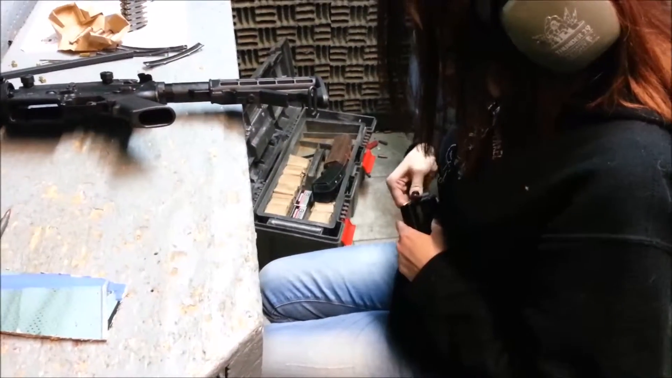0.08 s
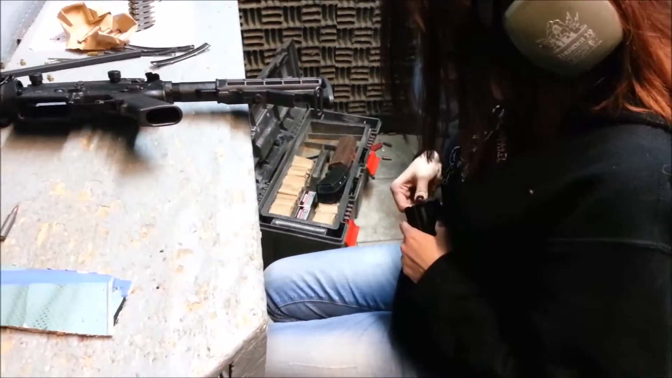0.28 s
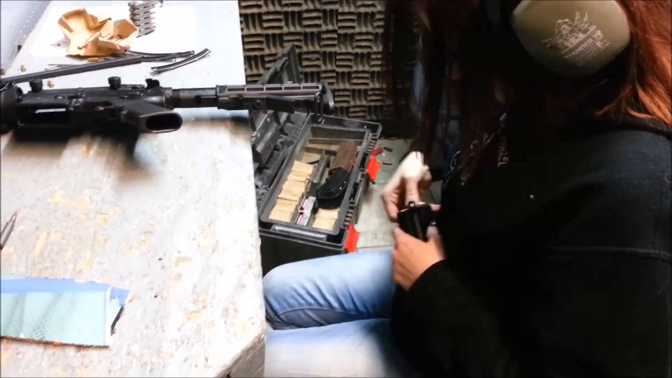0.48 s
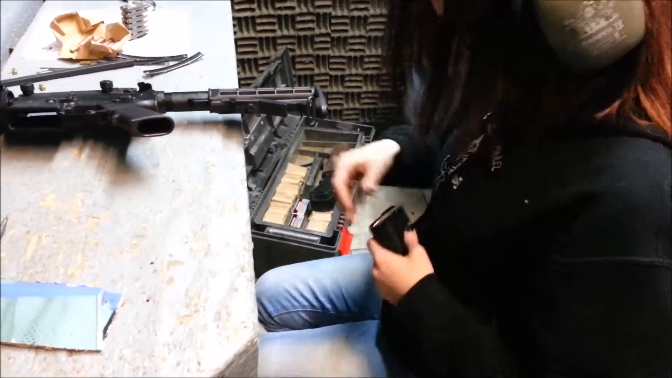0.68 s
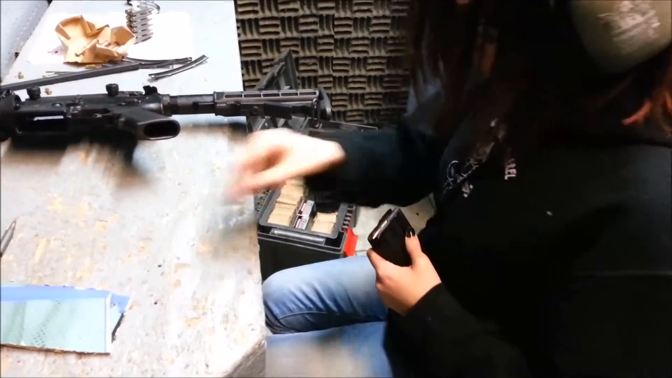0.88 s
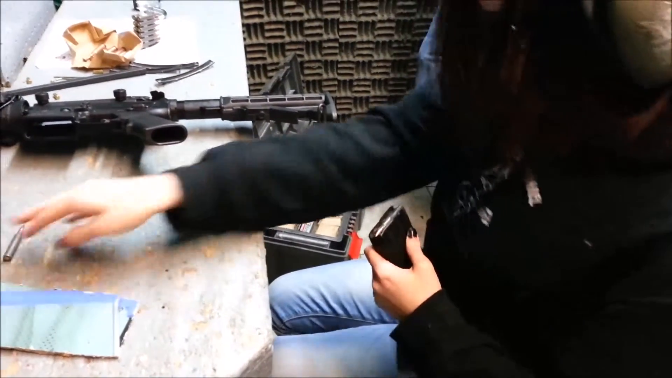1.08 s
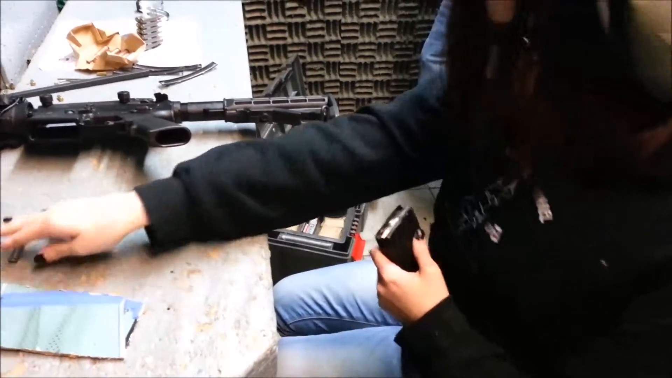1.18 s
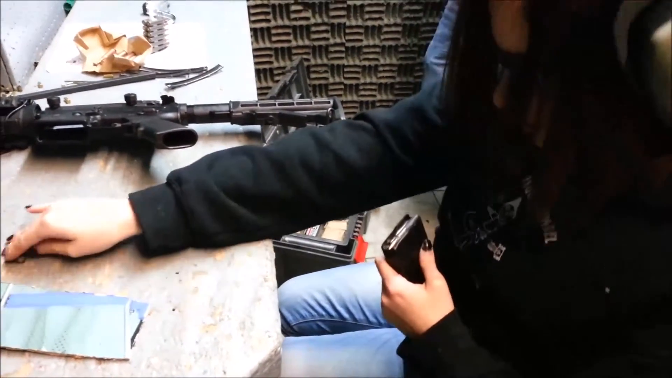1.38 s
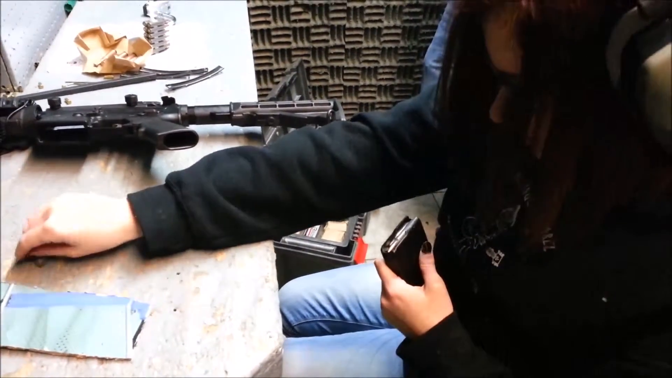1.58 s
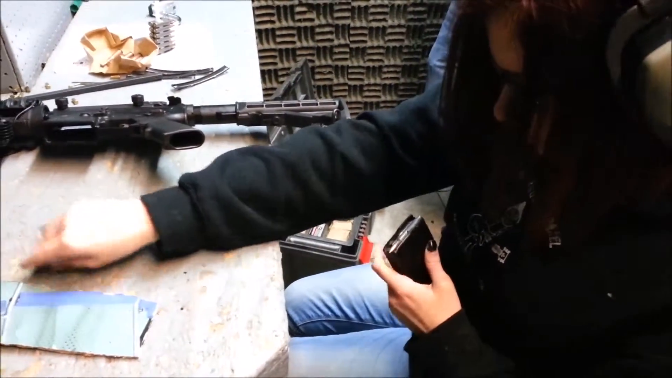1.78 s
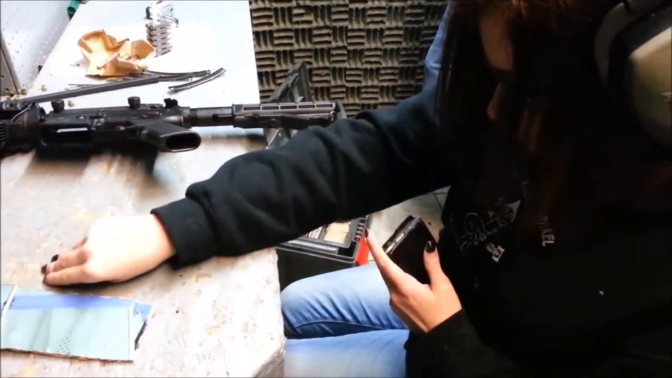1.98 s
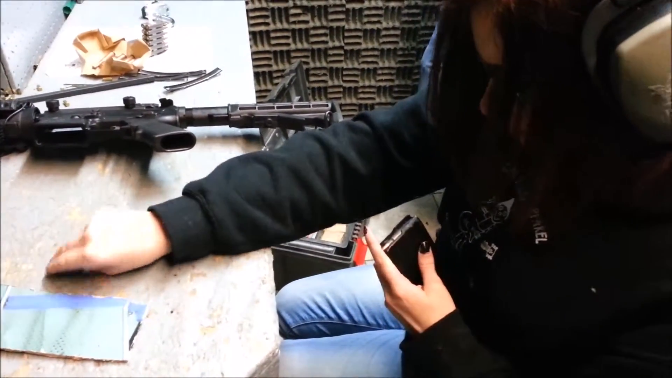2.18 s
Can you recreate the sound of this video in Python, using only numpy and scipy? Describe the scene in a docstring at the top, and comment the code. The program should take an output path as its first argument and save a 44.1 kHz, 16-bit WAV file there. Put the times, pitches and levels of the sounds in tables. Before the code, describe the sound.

One loud, hard click as a cartridge is pushed into a hand-held magazine, a faint sleeve swish, then fingers drag and knock cartridges on a bench; close stereo microphone in a small padded booth.

```python
"""Loading a magazine in a padded booth

A cartridge is worked into a hand-held magazine and snaps under the feed lips, loud enough to overload the microphone.
A sleeve swishes as the arm reaches out; fingers drag the next cartridges over a bench and knock them about.
Blows are short bursts plus fading rings and echoes; cloth, skin and the quiet ventilation are filtered noise."""
import sys
import numpy as np
from scipy import signal
from scipy.fft import rfft, irfft, next_fast_len
from scipy.io import wavfile
from scipy.ndimage import uniform_filter1d, map_coordinates

SR = 44100
rng = np.random.default_rng(int(sys.argv[2]) if len(sys.argv) > 2 else 0)


def to_wav(s):
    """Save 16-bit WAV."""
    ch = np.atleast_2d(s).T  # columns
    pcm = np.round(np.clip(ch, -1, 1) * 32767)  # PCM
    wavfile.write(sys.argv[1], SR, pcm.astype(np.int16))


N = 97020  # samples, 2.2 seconds

# Levels of single sounds are those before any high-pass or balance filter.
# The cartridge is forced past the feed lips and seated. Each row: start in seconds, level in dB,
# treble limit of the contact in Hz, chatter decay in seconds, shell clack against the ring in dB.
SNAPS = [(.2427, -14, 7070, 0.0029, -14.5), (0.2569, -4.5, 13300, 0.005, -9.5),
         (0.2592, -8.5, 12000, 0.0021, 4.5)]
# Small sounds at the magazine: a faint short noise just before the snap (the two rows from 0.235 to 0.24 s);
# in the other rows cartridge and thumb shift. Each row: start in seconds, level in dB, treble limit in Hz.
SMALL_SOUNDS = [(.0115, -34.5, 2690), (.0385, -38, 850), (.192, -45, 825), (.2355, -34.5, 1510),
                (.2395, -38, 2030), (.331, -43, 1010), (.441, -46.5, 875), (0.484, -49, 2410),
                (.493, -51, 2240), (.5505, -42, 1730)]
# Ring of the loaded magazine. Each row: pitch in Hz, relative level in dB, time to fade by 60 dB in seconds.
MAGAZINE_MODES = [(762, 0.5, 0.053), (1085.5, -2, 0.092), (1181, -3.5, .07), (1255, 0, 0.063),
                  (1291, -0.5, .085), (1466, 0, 0.057), (1663, -3.5, 0.043), (1979, -3.5, 0.045),
                  (2293, 0, 0.045), (2380, -4.5, 0.11), (2790, -6, 0.098), (3217, -6.5, 0.14),
                  (3330, -2.5, .11), (3760, -7, 0.068), (3872, -8, .11), (4295, -1.5, .06),
                  (4655, -1.5, 0.067)]
# Crack of metal on the magazine. Each row: frequency in Hz, relative level in dB.
MAGAZINE_CRACK = [(60, -19), (330, -32), (490, -22), (690, 0), (980, -2.5), (1300, -0.5), (2000, -4),
                  (3500, -4.5), (5200, -9), (7500, -13.5), (13800, -11.5)]
# The magazine as the two microphones hear it. Each row: frequency in Hz, left minus right in dB.
MAGAZINE_BALANCE = [(700, -1), (1300, 1.5), (2300, 10.5), (4400, 1.5), (6500, -6.5), (13000, 0)]
# Fingers rustle on the magazine. Each row: time in seconds, level in dB.
GRIP_LEVEL = [(0, -45.5), (.06, -62.5), (.12, -57.5), (.22, -60), (.37, -56.5), (.43, -60), (.53, -60.5),
              (.56, -52.5), (.6, -52), (.64, -72)]
# Cartridges knock on the bench. Each row: start in seconds, level in dB, treble limit in Hz,
# bass boost in dB, pitch favoured by the struck spot in Hz.
KNOCKS = [(1.4256, -48, 7100, -13, 3000), (1.545, -37, 1570, -14, 1100), (1.6084, -29, 2550, 9.5, 785),
          (1.6113, -29, 1640, 4.5, 1120), (1.6183, -25.5, 1330, 1.5, 1260), (1.6225, -30, 3630, 10.5, 1230),
          (1.669, -33.5, 1000, 15, 805), (1.677, -40, 1290, 8, 1200), (1.7458, -31.5, 10000, 19, 3000),
          (1.7683, -29.5, 1270, 3, 705), (1.7755, -37, 1290, 1, 1510), (1.821, -52, 1210, 3, 780),
          (1.828, -42, 1420, -27, 1550), (1.869, -29, 4300, 16, 3120), (1.9227, -33, 4480, -0.5, 2800),
          (2.0526, -35.5, 1170, -13, 760), (2.149, -44, 2010, 10.5, 1580), (2.157, -33, 7770, 3, 2970),
          (2.168, -47.5, 6040, 21, 3000)]
# The hand bumps the bench. Each row: start in seconds, level in dB.
BUMPS = [(1.537, -35.5), (1.575, -42.5), (1.643, -34), (1.6557, -33.5), (1.688, -41), (2.183, -44)]
# Ring of the bench top. Each row: pitch in Hz, relative level in dB, time to fade by 60 dB in seconds.
BENCH_MODES = [(155, 7, 0.35), (207, -6, 0.076), (288, 0, 0.06), (367, -0.5, 0.13), (472, -22, 0.14),
               (777, 1.5, 0.062), (1118, -4, 0.11), (1263, 1, 0.12), (1540, 10, 0.089), (2624, 7, 0.037),
               (3040, 8, 0.021)]
# Clack of a cartridge on the bench. Each row: frequency in Hz, relative level in dB.
BENCH_CLACK = [(60, -26), (120, -34), (200, -1.5), (450, -3), (800, -3), (1600, 1), (2100, 2), (3000, 1),
               (4000, -8), (4700, -3.5), (6000, -12), (14000, -5.5)]
# A dragged cartridge sticks and slips. Each row: start in seconds, level in dB.
SLIPS = [(1.469, -34.5), (1.481, -30), (1.493, -31.5), (1.5045, -32.5), (1.52, -34), (1.5373, -35.5),
         (1.5614, -32), (1.598, -38)]
# Colour of the drag. Each row: frequency in Hz, relative level in dB.
DRAG_COLOUR = [(200, -28), (380, -9), (600, -4.5), (900, 1.5), (1150, -11), (1700, 6), (2200, 3.5),
               (3000, -1.5), (3950, -12), (4400, -28), (6500, -42), (14000, -38)]
# Ring of the dragged cartridge. Each row: pitch in Hz, relative level in dB, time to fade by 60 dB in seconds.
CASE_MODES = [(1650, -0.5, 0.054), (3660, -10, 0.024)]
# Fingers rub along the bench. Each row: time in seconds, level in dB.
RUB_LEVEL = [(1.38, -77), (1.41, -56.5), (1.5, -54.5), (1.56, -47), (1.68, -55), (1.72, -50), (1.79, -57),
             (1.85, -55), (1.89, -55), (1.99, -54.5), (2.06, -59.5), (2.13, -68), (2.2, -48.5)]
# Colour of skin rubbing on the bench. Each row: frequency in Hz, relative level in dB.
RUB_COLOUR = [(90, -37.5), (130, -21.5), (170, -1.5), (290, -5.5), (420, -8), (600, -15.5), (1000, -21.5),
              (3000, -25.5), (7000, -31), (14000, -33)]
# A fingertip judders on the bench. Each row: peak in seconds, spread in seconds, pitch in Hz, level in dB.
JUDDERS = [(1.43, 0.019, 234.5, -57.5), (1.954, 0.055, 165.9, -52)]
# Sleeve swishes. Each row: peak in seconds, rise in seconds, fall in seconds, level in dB,
# centre in Hz, distance from the centre to half gain in octaves.
SWISHES = [(0.585, 0.014, 0.016, -47.5, 3580, 0.088), (.588, 0.02, 0.012, -51.5, 4720, 0.073),
           (.59, 0.035, .02, -59.5, 6000, 1), (.84, 0.051, 0.1, -72, 5100, 0.068),
           (.99, 0.092, 0.043, -69, 5380, 0.06), (1.109, 0.077, 0.052, -68.5, 4920, 0.084)]
# Colour of ventilation and hiss. Each row: frequency in Hz, relative level in dB per Hz.
AIR_COLOUR = [(15, -57.5), (25, -35.5), (51, -12.5), (117, -2), (290, -5.5), (520, -12), (755, -14),
              (1360, -18.5), (2310, -19), (4260, -22.5), (5270, -23), (6350, -26.5), (14500, -23)]
# Likeness of left and right in the air. Each row: frequency in Hz, correlation from 0 to 1.
AIR_LIKENESS = [(50, 0.1), (150, 0.09), (500, 0.25), (1500, .3), (6000, 0.063)]
# Likeness of left and right in the echoes, cloth and skin. Each row: frequency in Hz, correlation from 0 to 1.
ROOM_LIKENESS = [(200, 0.93), (700, 0.24), (1500, 0.48), (4000, 0.077)]
# Decay of the booth. Each row: frequency in Hz, time to fade by 60 dB in seconds.
ROOM_T60 = [(150, .19), (600, 0.24), (1500, 0.14), (3300, 0.16), (6500, .125), (13000, 0.12)]

# Settings of the blows: names end in their unit; pan is left minus right.
MAGAZINE = dict(ring_db=-4.5, chatter_db=13.5, room_db=-6.5, pan_db=-0.3, lag_s=-0.000061)
SMALL = dict(chatter_s=0.0034, chatter_db=5.5, ring_db=-7.5, room_db=-6.5, pan_db=-1.5, lag_s=0)
BENCH = dict(chatter_s=0.0008, chatter_db=-3, ring_db=-7, room_db=-2, pan_db=5.5, lag_s=0.00024)
SLIP = dict(chatter_s=0.001, chatter_db=-6, ring_db=-5, room_db=-3.5, pan_db=5, lag_s=0.00023)

MAGAZINE_BASS_HZ, BENCH_BASS_HZ = 529, 150  # high-pass limits
CLACK_HZ, CLACK_T60_S = 715, 0.026  # hollow clack of the magazine shell
GRIP_GRAINS_PER_S, GRIP_SPREAD_DB, GRIP_CONTACT_HZ = 4500, 5, 2500
BASS_HZ = 434  # a bass boost acts below about here
SPOT_OCTAVES = 0.38  # distance at which a struck spot halves a mode of the bench
BUMP_HZ, BUMP_CONTACT_HZ, BUMP_RING_DB = 347, 565, -8.5  # ring level is on top of the bench's own
CASE_SCATTER = 0.07  # random spread of the case pitch, as a fraction
JUDDER_WANDER = 0.046  # random spread of the judder pitch, as a fraction
AIR_DB = -55
ROOM_ONSET_S = 0.0013
ROOM_CLUMP_DB, ROOM_CLUMP_SAMPLES = 2.5, 48
HIT_S, LEVEL_WINDOW_S, TOP_HZ = 0.4, 0.005, 14700
T = np.arange(N) / SR  # time in the scene, seconds
AGE = T[:int(HIT_S * SR)]  # time since a blow, seconds


def magazine():
    """Small sounds and a snap as the cartridge goes home: the shell clacks and each blow rings the magazine."""
    out, room = grip(), booth()
    for start, db, contact_hz in SMALL_SOUNDS:
        blow = contact(MAGAZINE_CRACK, room, ring=magazine_ring(), **SMALL)
        add(out, start, db, soften(blow, contact_hz))
    out = highpass(out, MAGAZINE_BASS_HZ)
    clack = unit(highpass(mode(CLACK_HZ, 0, CLACK_T60_S), MAGAZINE_BASS_HZ))
    for start, db, contact_hz, chatter_s, clack_db in SNAPS:
        body = magazine_ring() + amp(clack_db) * clack
        blow = contact(MAGAZINE_CRACK, booth(), chatter_s, ring=body, **MAGAZINE)
        add(out, start, db, soften(blow, contact_hz))
    left = colour(out[0], lambda f: amp(curve(MAGAZINE_BALANCE, f) / 2))
    right = colour(out[1], lambda f: amp(-curve(MAGAZINE_BALANCE, f) / 2))
    return np.array([left, right])


def magazine_ring():
    """The magazine's modes, each starting up or down at random."""
    signs = rng.choice([-1, 1], len(MAGAZINE_MODES))
    ring = sum(sign * mode(*row) for sign, row in zip(signs, MAGAZINE_MODES))
    return unit(highpass(ring, MAGAZINE_BASS_HZ))


def grip():
    """Fingers rustle on the magazine in dense soft grains, heard directly and by way of the booth."""
    size, chance = rng.standard_normal((2, N)), rng.random(N)
    happens = chance < GRIP_GRAINS_PER_S / SR
    grains = happens * np.sign(size[0]) * amp(GRIP_SPREAD_DB * size[1])
    near = soften(colour(grains, lambda f: amp(curve(MAGAZINE_CRACK, f))), GRIP_CONTACT_HZ)
    echo = signal.fftconvolve(near[None], booth(), axes=1)[:, :N]
    heard = near + amp(-0.5) * echo
    level_db = np.interp(T, *np.array(GRIP_LEVEL).T, right=-np.inf)  # silent after the last row
    return np.sqrt(N) * unit(heard) * amp(level_db)


def bench():
    """A cartridge is dragged in jerks, others knock on the top and the hand bumps it; the blows share one echo."""
    out, room = np.zeros((2, N)), booth()
    shifts = np.exp(CASE_SCATTER * rng.standard_normal(len(SLIPS)))
    for (start, db), shift in zip(SLIPS, shifts):
        case = unit(sum(mode(hz * shift, mode_db, t60) for hz, mode_db, t60 in CASE_MODES))
        add(out, start, db, contact(DRAG_COLOUR, room, ring=case, **SLIP))
    for start, db, contact_hz, bass_db, spot_hz in KNOCKS:
        blow = contact(BENCH_CLACK, room, ring=bench_ring(spot_hz), **BENCH)
        add(out, start, db, soften(blow, contact_hz, bass_db))
    for start, db in BUMPS:
        ring = bench_ring(BUMP_HZ) * amp(BUMP_RING_DB)
        blow = contact(BENCH_CLACK, room, ring=ring, **BENCH)
        add(out, start, db, soften(blow, BUMP_CONTACT_HZ))
    return highpass(out + fingers(), BENCH_BASS_HZ)


def bench_ring(spot_hz):
    """The spot that is struck favours the bench modes near one pitch."""
    ring = 0
    for hz, db, t60 in BENCH_MODES:
        octaves_away = np.log2(hz / spot_hz)
        ring = ring + mode(hz, db, t60) / (1 + (octaves_away / SPOT_OCTAVES) ** 2)
    return unit(ring)


def fingers():
    """Skin rubs along the bench top as coloured noise and judders as a low hum with a wandering pitch."""
    rubbing = unit(colour(diffuse(ROOM_LIKENESS, N), lambda f: amp(curve(RUB_COLOUR, f))))
    out = rubbing * np.sqrt(N) * amp(np.interp(T, *np.array(RUB_LEVEL).T))
    for peak, spread, hz, db in JUDDERS:
        wander = np.sqrt(N) * unit(uniform_filter1d(rng.standard_normal(N), size=800))
        phase = 2 * np.pi * np.cumsum(hz * (1 + JUDDER_WANDER * wander)) / SR
        swell = np.exp(-((T - peak) / spread) ** 2 / 2)
        out = out + amp(db) * np.sqrt(2) * np.sin(phase) * swell
    return out


def sleeve():
    """Sliding cloth: bands of hiss that swell and fade."""
    out = np.zeros((2, N))
    for peak, rise, fall, db, hz, octaves in SWISHES:
        band = lambda f: 1 / (1 + (np.log2((f + 1) / hz) / octaves) ** 2)
        hiss = unit(colour(diffuse(ROOM_LIKENESS, N), band))
        swell = np.exp(-((T - peak) / np.where(T < peak, rise, fall)) ** 2 / 2)
        out += amp(db) * np.sqrt(N) * hiss * swell
    return out


def air():
    """Steady ventilation under a fine hiss, made of coloured noise."""
    noise = colour(diffuse(AIR_LIKENESS, N), lambda f: amp(curve(AIR_COLOUR, f)))
    return amp(AIR_DB) * np.sqrt(N) * unit(noise) * sides(pan_db=-0.5)


def booth():
    """Uneven reflections that build up quickly and die at a different speed in each band."""
    clump_db = ROOM_CLUMP_DB * np.repeat(rng.standard_normal(len(AGE)), ROOM_CLUMP_SAMPLES)
    noise = rfft(diffuse(ROOM_LIKENESS, len(AGE)) * amp(clump_db[:len(AGE)]))
    hz = np.arange(noise.shape[1]) / HIT_S
    centres, t60s = np.array(ROOM_T60).T
    tail = 0
    for row, t60 in zip(np.eye(len(centres)), t60s):
        band = np.interp(np.log(hz + 1), np.log(centres), row)  # overlaps its neighbours
        tail = tail + irfft(noise * band, len(AGE)) * np.exp(-np.log(1000) * AGE / t60)
    build_up = 1 - np.exp(-(AGE / ROOM_ONSET_S) ** 2)
    return unit(tail * build_up)


def contact(spectrum, room, chatter_s, chatter_db, room_db, pan_db, lag_s, ring=0, ring_db=0):
    """A blow with brief chatter and the ring of the body, then the booth; a positive lag makes the left late."""
    push = amp(chatter_db) * unit(rng.standard_normal(len(AGE)) * np.exp(-AGE / chatter_s))
    push[0] += 1  # the blow itself
    tone = lambda f: amp(curve(spectrum, f))
    direct = (unit(colour(push, tone)) + amp(ring_db) * ring) * sides(pan_db)
    late = int(lag_s < 0)  # 0 is left, 1 is right
    direct[late] = map_coordinates(direct[late], [(AGE - abs(lag_s)) * SR], order=3)
    return direct + amp(room_db) * unit(colour(room, tone))


def soften(x, contact_hz, bass_db=0):
    """A softer contact loses treble; a heavier one gains bass."""
    def gain(f):
        bass = amp(bass_db / (1 + (f / BASS_HZ) ** 4))
        return bass / np.sqrt(1 + (f / contact_hz) ** 6)
    return colour(x, gain)


def mode(hz, db, t60):
    """One fading tone of a ringing body."""
    return amp(db) * np.sin(2 * np.pi * hz * AGE) * np.exp(-np.log(1000) * AGE / t60)


def highpass(x, hz):
    """A steep fourth-order high-pass that removes the deep bass below the given limit."""
    return signal.sosfilt(signal.butter(4, hz, "high", fs=SR, output="sos"), x)


def add(out, start, db, x):
    """Mix in a hit whose energy equals a steady sound of this level lasting the level window."""
    i = int(start * SR)
    hit = amp(db) * np.sqrt(LEVEL_WINDOW_S * SR) * unit(x)
    out[:, i:i + len(AGE)] += hit[:, :N - i]


def diffuse(likeness, size):
    """Stereo noise whose sides are alike by a set amount at each frequency."""
    mid, side = rfft(rng.standard_normal((2, size)))
    c = np.clip(curve(likeness, np.arange(len(mid)) * SR / size), 0, 1)
    mid, side = mid * np.sqrt(1 + c), side * np.sqrt(1 - c)
    return irfft(np.array([mid + side, mid - side]), size)


def colour(x, gain):
    """Filter by a gain for each frequency, with no sound ahead of its cause (minimum phase)."""
    n = 2 * next_fast_len(x.shape[-1])
    cep = irfft(np.log(gain(np.arange(n // 2 + 1) * SR / n) + 1e-9))
    cep[1:n // 2] *= 2  # folding the cepstrum forward in time gives minimum phase
    cep[n // 2 + 1:] = 0
    return irfft(rfft(x, n) * np.exp(rfft(cep)), n)[..., :x.shape[-1]]


def curve(points, hz):
    """Read (Hz, value) points on a log-frequency axis."""
    f, v = np.array(points).T
    return np.interp(np.log(hz + 1), np.log(f), v)


def sides(pan_db):
    """Left and right gains, set apart by the pan."""
    return amp(np.array([[pan_db], [-pan_db]]) / 2)


def unit(x):
    """Scale to an average energy of one per channel."""
    return x / np.sqrt(np.mean(np.sum(x ** 2, axis=-1)))


def amp(db):
    """Decibels to gain."""
    return 10 ** (np.asarray(db) / 20)


def scene():
    """Everything in the booth."""
    return magazine() + bench() + sleeve() + air()


def record(dry):
    """The microphone clips at full scale, then a steep low-pass cuts off the top."""
    lowpass = signal.ellip(10, 0.2, 70, TOP_HZ, fs=SR, output="sos")
    return signal.sosfilt(lowpass, np.clip(dry, -1, 1))


dry = scene()
out = record(dry)
to_wav(out)
```